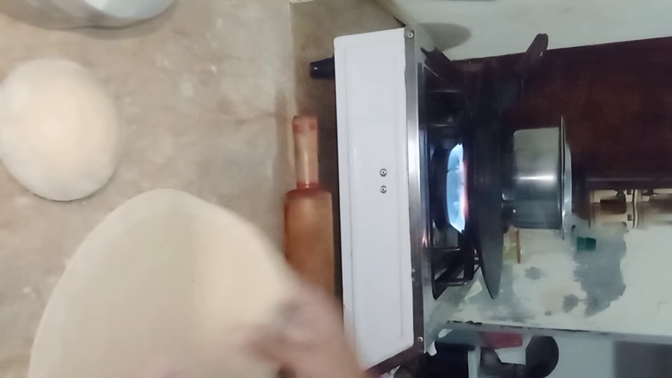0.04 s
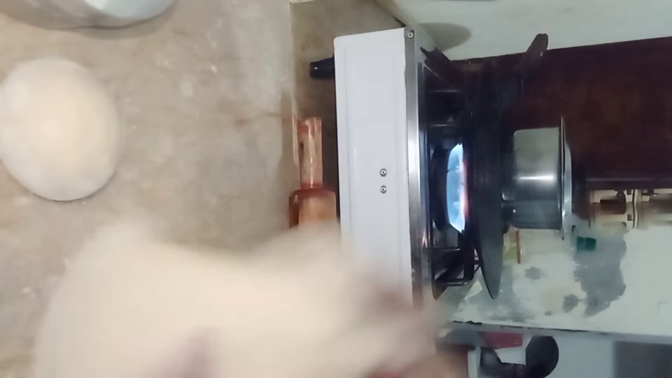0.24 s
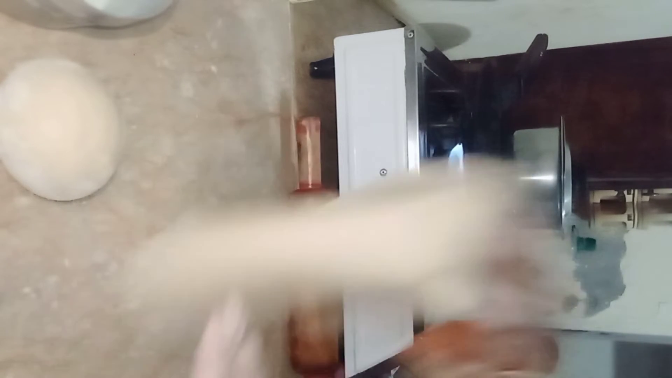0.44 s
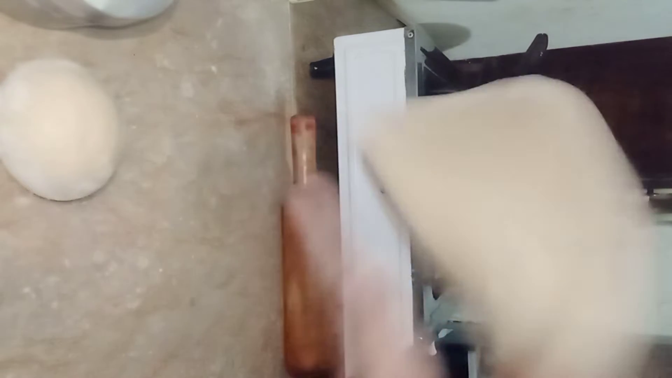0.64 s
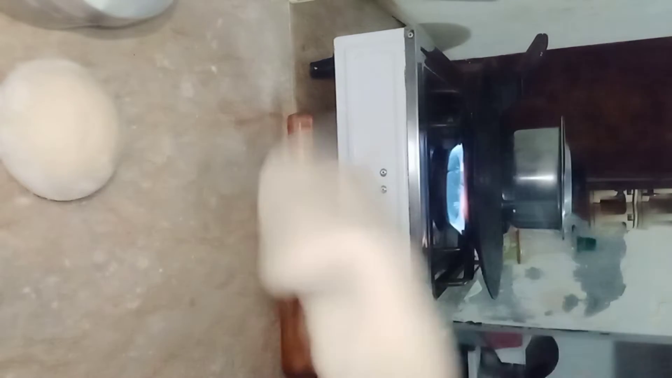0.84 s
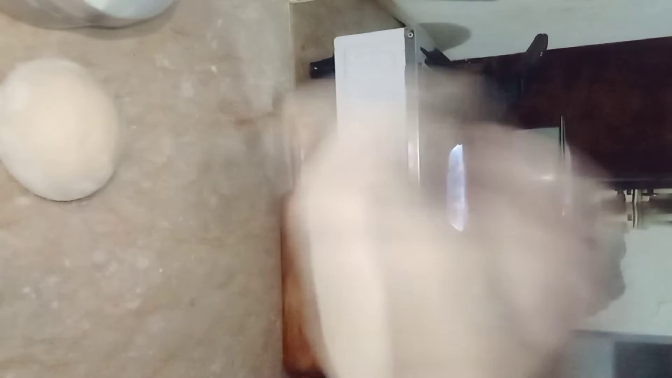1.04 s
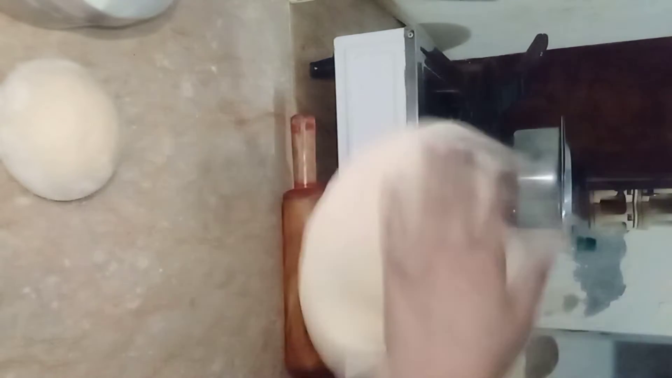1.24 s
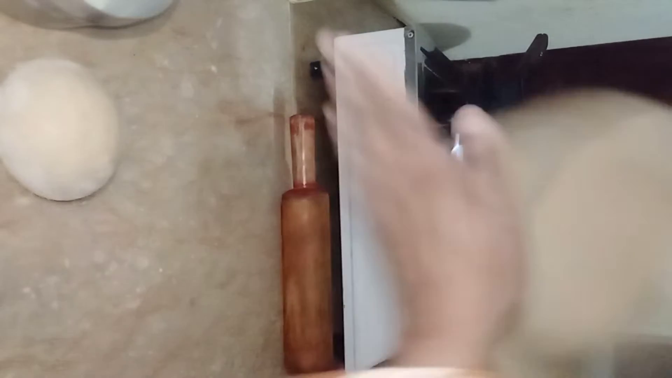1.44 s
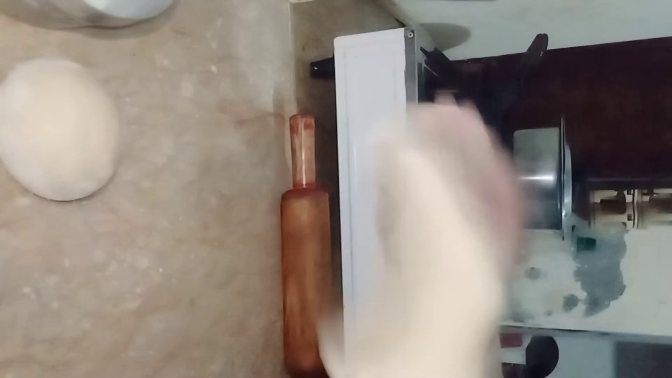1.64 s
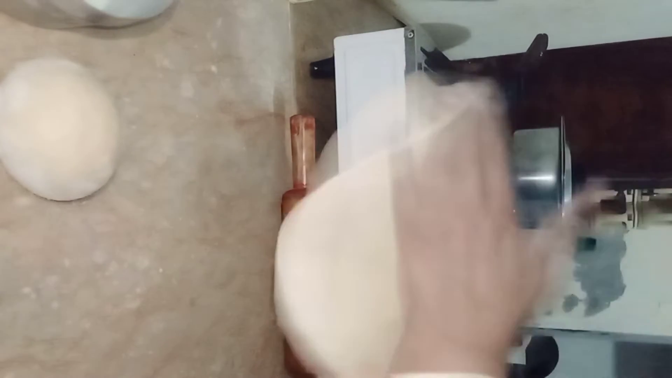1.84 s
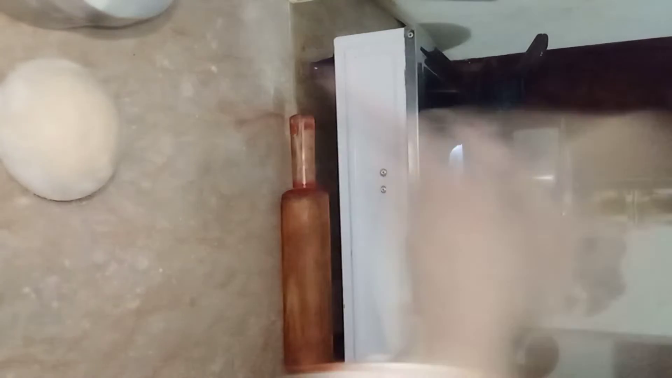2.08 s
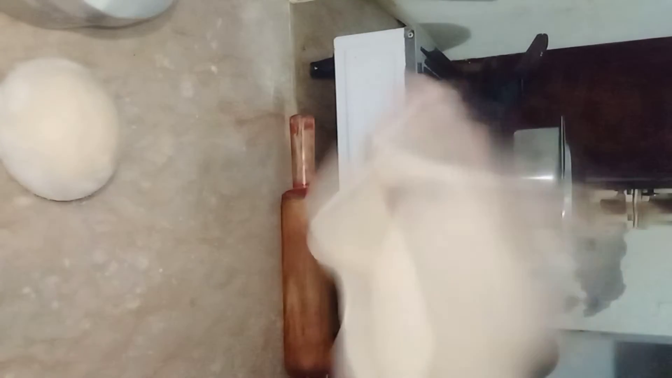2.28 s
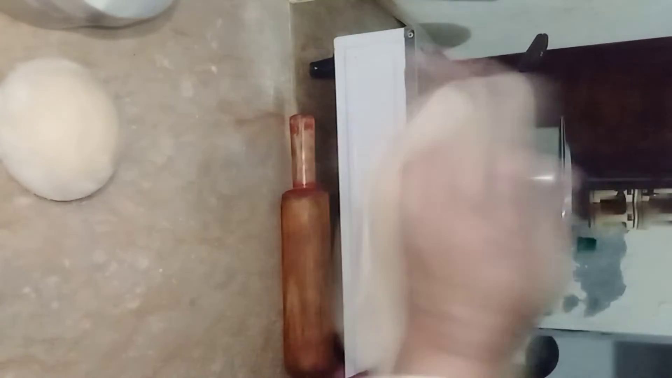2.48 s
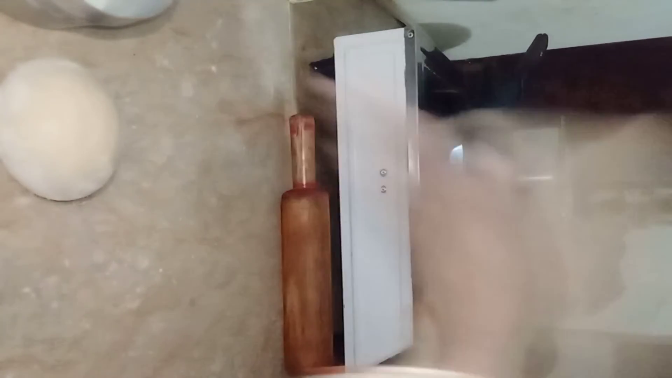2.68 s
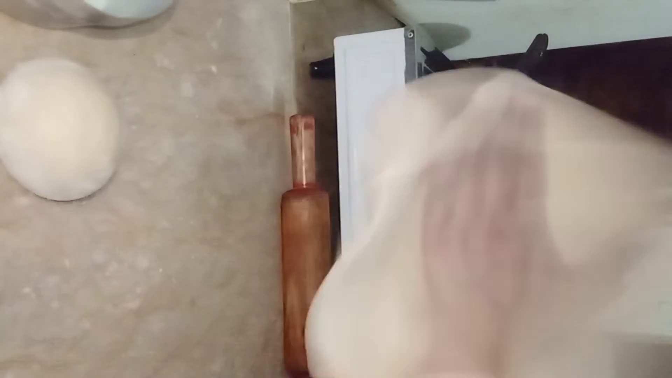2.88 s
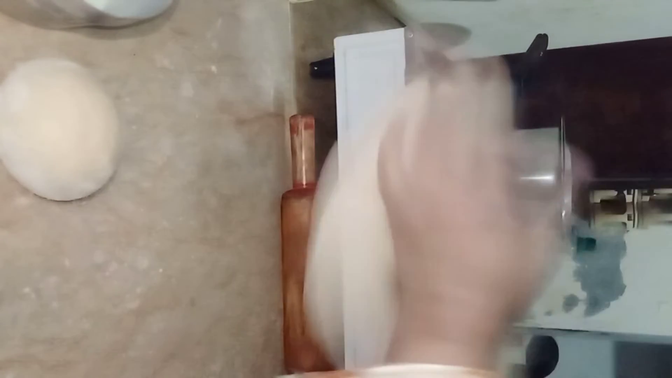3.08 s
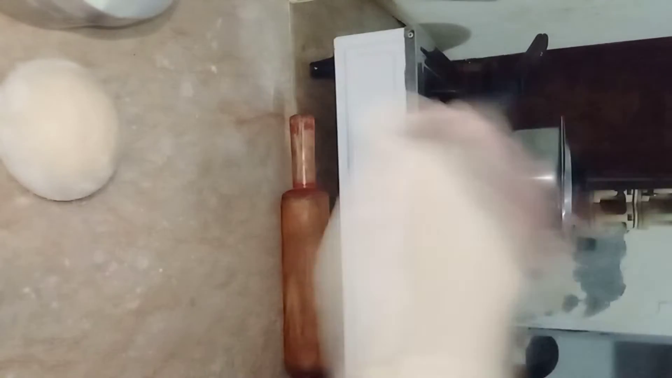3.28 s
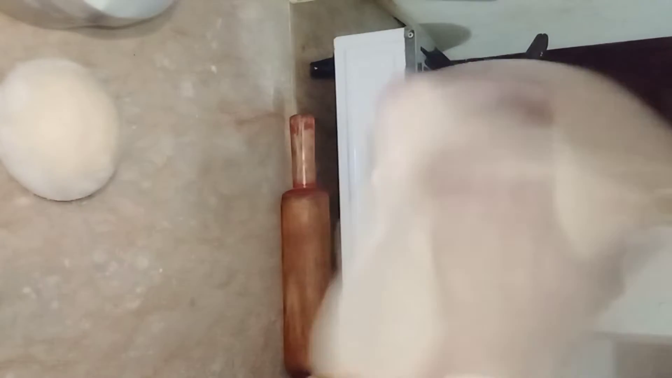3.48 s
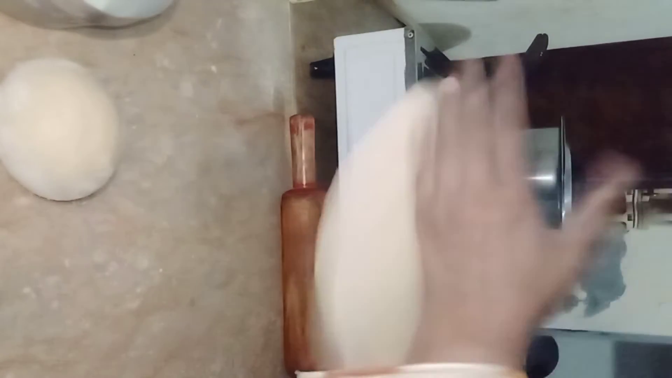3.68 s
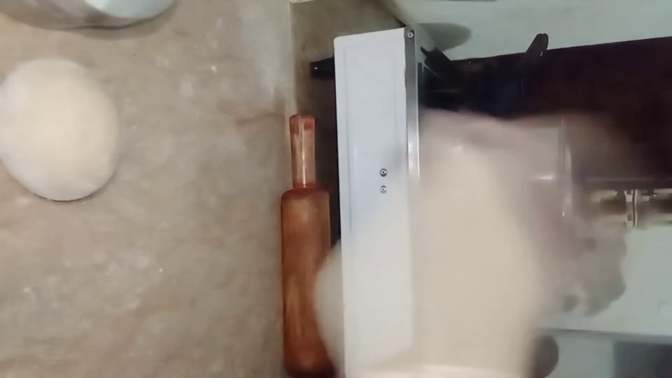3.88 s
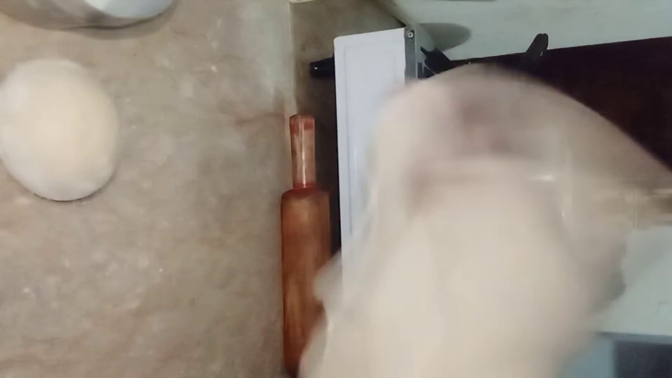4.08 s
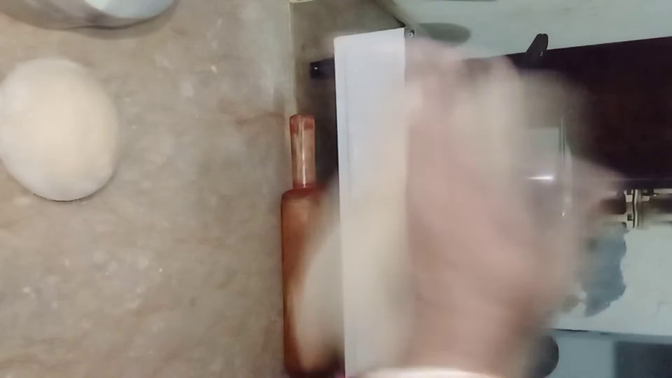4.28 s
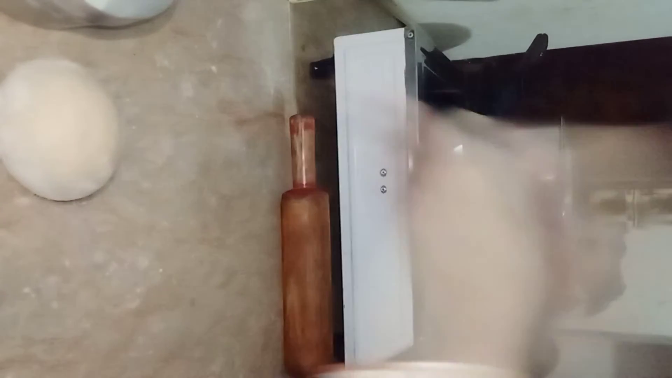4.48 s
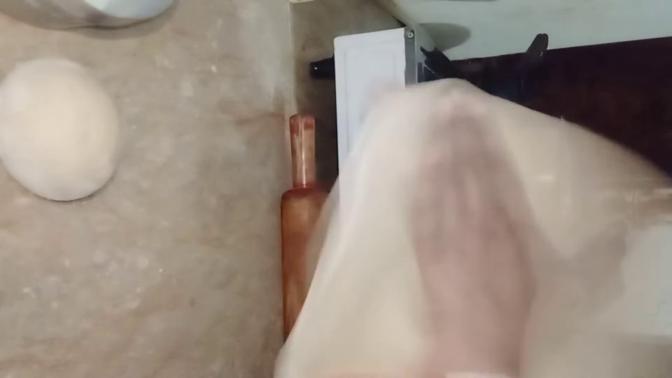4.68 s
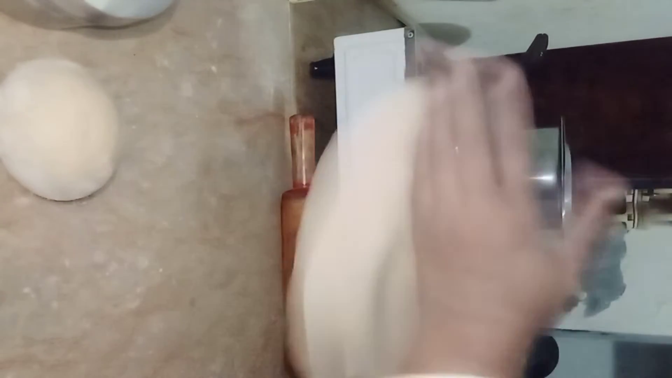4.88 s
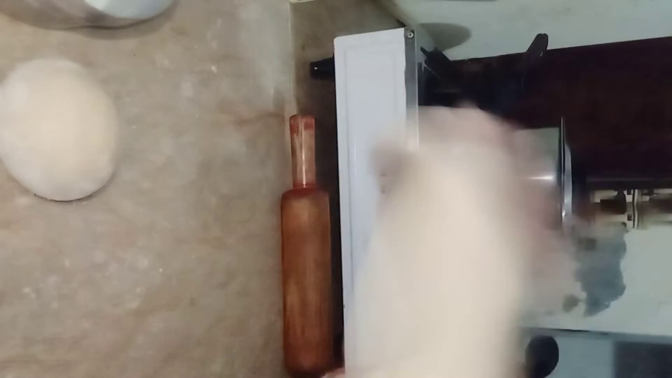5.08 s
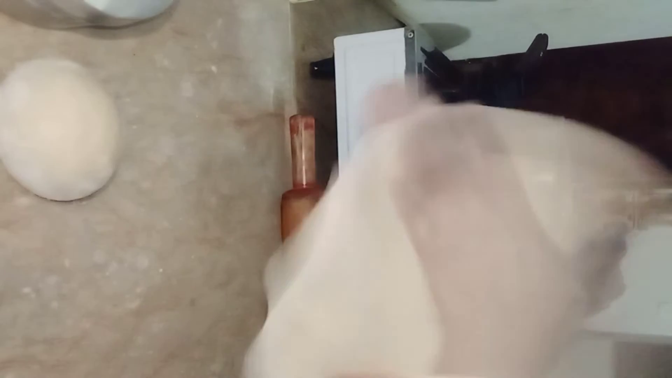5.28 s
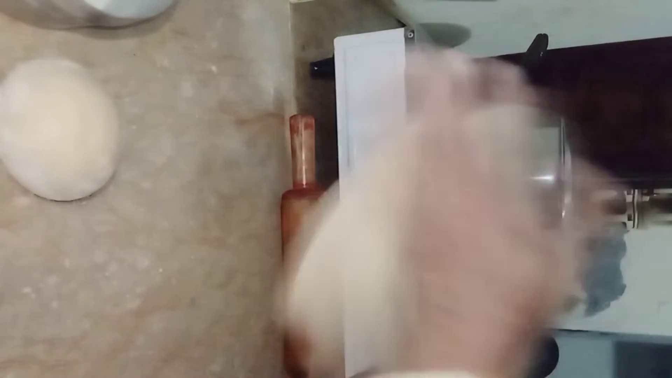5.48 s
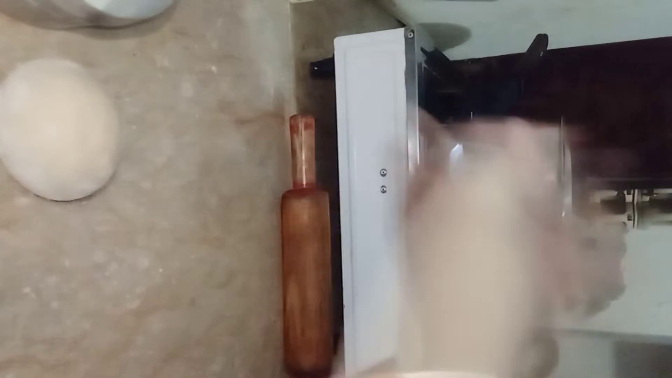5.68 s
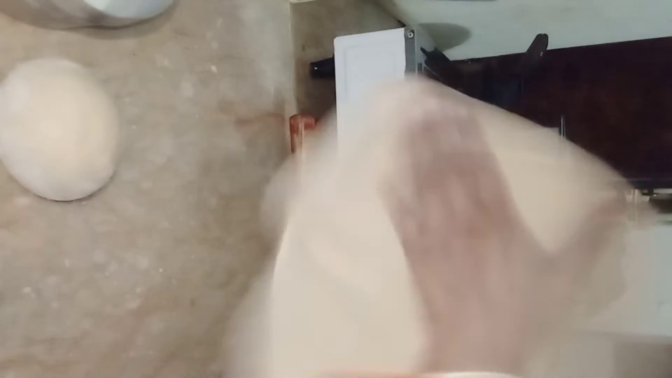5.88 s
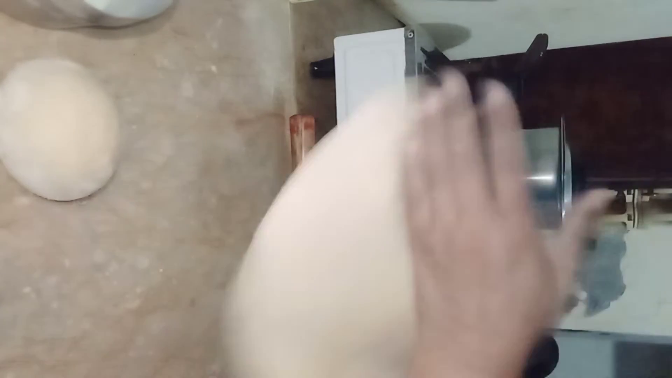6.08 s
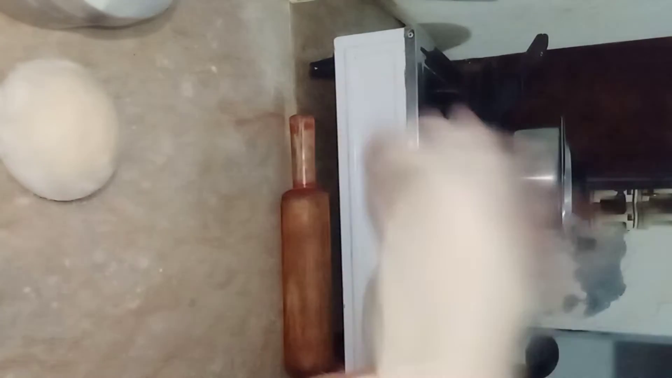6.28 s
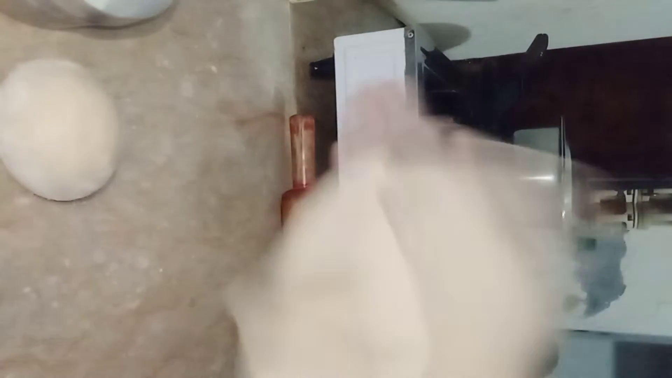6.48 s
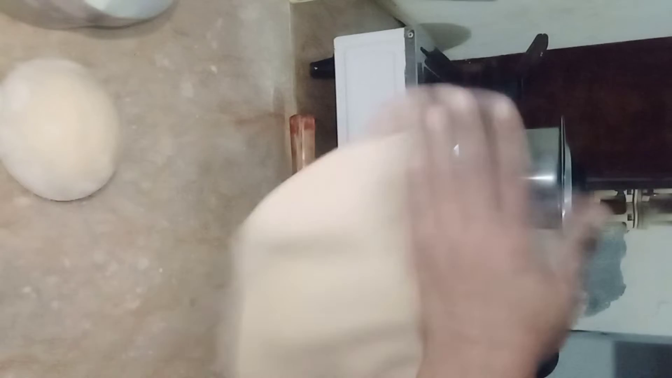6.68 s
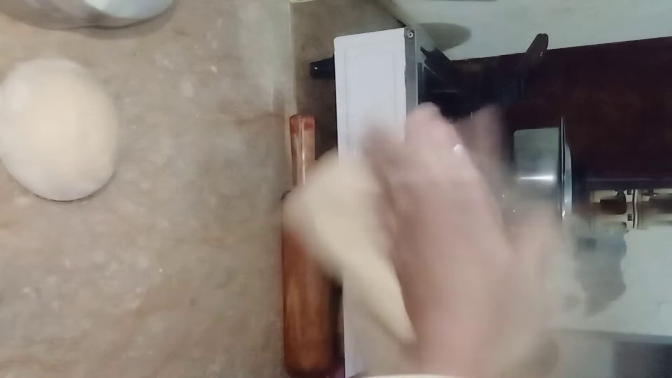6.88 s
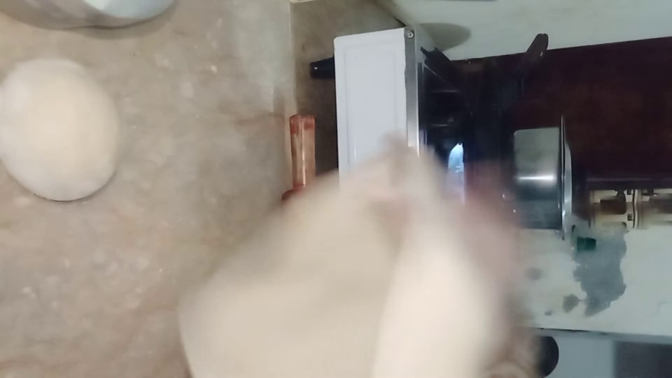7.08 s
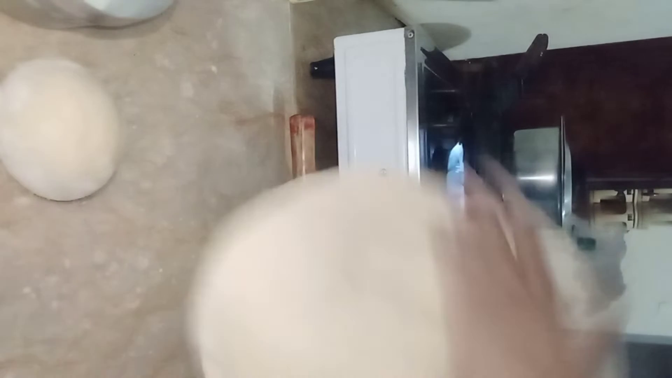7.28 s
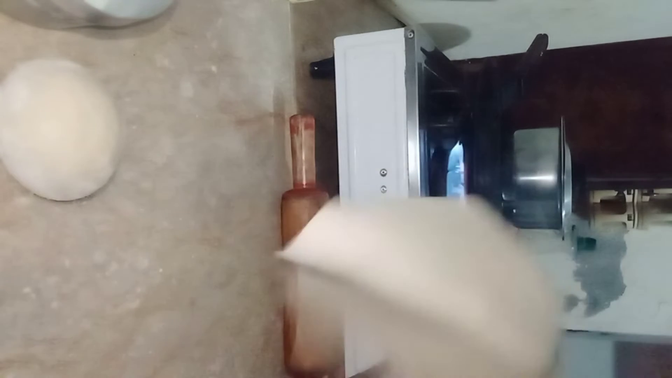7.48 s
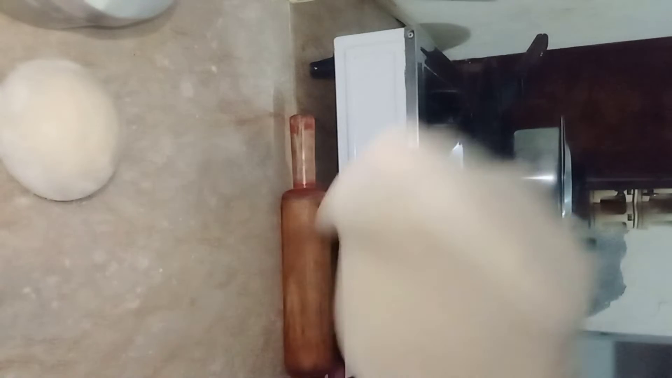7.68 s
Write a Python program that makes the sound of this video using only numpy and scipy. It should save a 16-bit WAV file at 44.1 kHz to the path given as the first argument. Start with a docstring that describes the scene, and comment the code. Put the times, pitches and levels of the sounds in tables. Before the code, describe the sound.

Dough slapped from palm to palm in a kitchen, a quick, even run of claps with faint bangle ticks and a low gas hiss.

```python
"""A gas flame hisses in a hard-walled kitchen, and bangles tick faintly. Flat dough brushes over skin,
then from about 1 s it is tossed from palm to palm, stirring a low rumble of air. Each landing is a few
quick contacts of fingers and palm that squeeze out a pocket of air. Near 4 s the bangles tick again.
After 5.5 s the slaps soften, the dough slides more, and the bangles rub and ring twice. A small
microphone that favours sound near 2 kHz hears it all through a noise suppressor."""
import sys
import numpy as np
from scipy import signal
from scipy.fft import rfft, irfft
from scipy.io import wavfile
from scipy.ndimage import uniform_filter1d, map_coordinates

SR = 44100
rng = np.random.default_rng(int(sys.argv[2]) if len(sys.argv) > 2 else 0)


def transcribe(u):
    """Save the signal u as a 16-bit wav file named by the first command-line argument.

    u: samples, shape (n,) or (channels, n), limited to [-1, 1]; the rate is SR.
    q: integer samples, one column per channel.
    """
    v = np.clip(np.atleast_2d(u).T, -1, 1)
    q = np.round(v * 32767).astype(np.int16)
    wavfile.write(sys.argv[1], SR, q)


N = 341334

# The flame and the kitchen's murmur of air. Each row: frequency in Hz, boost in dB.
FLAME_COLOUR = [(30, -12), (100, 15), (250, 6.5), (500, 1), (870, 5.5), (1100, 3.5), (1700, -1.5),
                (1900, 6), (2400, 4), (2650, -4.5), (2950, -1), (3150, 6), (3400, -9), (5000, -6)]
# Air stirred by the swinging dough. Each row: time in seconds, level in dB.
DRAUGHT_LEVELS = [(0, -89.5), (.56, -90), (.88, -84), (1.3, -81.5), (1.8, -76), (2.2, -71.5), (2.8, -79),
                  (3.05, -68.5), (3.21, -81), (3.49, -76.5), (3.77, -82.5), (4.3, -81), (4.76, -74.5),
                  (4.94, -83), (5.6, -84.5), (6.0, -77), (6.53, -84), (7.0, -78), (7.2, -79), (7.74, -77.5)]
# Bangles knocking together. Each row: start in seconds, level in dB, pitch in Hz.
BANGLE_TICKS = [(.075, -67.5, 3020), (.078, -66.5, 3730), (3.9015, -49.5, 10100), (3.911, -48, 8500),
                (3.921, -54, 6120), (3.921, -63, 4500)]
# The tones of a rubbed bangle. Each row: pitch in Hz, relative level in dB, flutters per second.
BANGLE_TONES = [(1950, -14, 12), (3450, -0.5, 38), (4440, -9, 40), (6320, -16, 35)]
# Bangles rubbing. Each row: start and end in seconds, level it grows to in dB, pitch multiplier.
BANGLE_RUBS = [(5.637, 5.776, -68, 1.005), (6.813, 6.985, -80.5, 1.03)]
# Dough sliding over skin. Each row: time of the peak in seconds, rustle gain in dB, drag gain in dB,
# seconds to swell by 20 dB, seconds to fade by 20 dB.
DOUGH_STROKES = [(0.635, -77, -69, .09, 0.35), (0.831, -78.5, -59, .09, .08), (.906, -80, -46, .02, .09),
                 (1.348, -78.5, -54.5, .025, 0.22), (1.426, -81.5, -63, .06, .06),
                 (5.59, -82, -56, .05, 0.15), (5.716, -78, -58, .1, 0.079), (6.112, -80, -41.5, .02, .06),
                 (6.175, -81.5, -48.5, .02, 0.14), (6.385, -73, -46, .02, 0.043),
                 (6.475, -71, -51.5, .12, .11), (6.727, -89.5, -51.5, .05, 0.18),
                 (6.78, -88.5, -60, .02, 0.2), (6.9, -92.5, -70.5, .2, .4), (7.013, -69, -41, .02, 0.025),
                 (7.098, -80, -55.5, .3, 0.13), (7.422, -92.5, -66, .04, 0.083),
                 (7.495, -79.5, -54.5, .04, 0.29)]
# Standing waves, the notes that ring between walls, counter and cupboards.
# Each row: pitch in Hz, level in dB, seconds to fade by 60 dB.
ROOM_NOTES = [(98, -60, .45), (167.9, -54, 0.38), (281, -55.5, 0.45), (350, -57, 0.51), (487, -56, 0.59),
              (847, -61, .45), (1266, -54, 0.57), (1307, -57.5, .5), (1405, -54.5, 0.65), (1540, -58, 0.45),
              (1935, -60, .5), (3470, -65.5, .5)]
# How long the kitchen echoes. Each row: frequency in Hz, seconds to fade by 60 dB.
ECHO_TIMES = [(60, 0.27), (160, .54), (420, 0.39), (1400, 0.56), (2300, 0.39), (3500, 0.55), (7700, 0.49),
              (11500, 0.52), (13500, 0.28), (15000, 0.2)]
# The tone of each landing on a hand. Each row: start in seconds, thump in dB, air pocket in dB,
# air pocket pitch in Hz, snap pitch in Hz, crack in dB, echo in dB, rise time in milliseconds.
DOUGH_LANDINGS = [(.897, -16.5, -37.5, 910, 2200, -45.5, -9.5, 1.3),
                  (1.340, -15.5, -12, 1480, 2090, -32.5, 3.5, 1.5),
                  (1.694, -25, -12, 1203, 2166, -28, -3, 0.57),
                  (1.966, -14.5, -5, 814, 2330, -31.5, -3.5, 1.15),
                  (2.271, -30, -13, 1486, 2626, -29.5, 3.5, 0.34),
                  (2.531, -15, -14, 1650, 1900, -27.5, 2, 1.05),
                  (2.840, -38, -21.5, 1370, 2464, -33.5, -0.5, .2),
                  (3.120, -10.5, -7, 1287, 1760, -24.5, -2.5, 1),
                  (3.418, -23.5, -18.5, 1550, 2524, -34, 1.5, .4),
                  (3.451, -36.5, -9.5, 1389, 2060, -35, -1, .6),
                  (3.708, -16.5, -4.5, 952, 2190, -28.5, -6, 1.55),
                  (4.006, -22.5, -18, 960, 2110, -31, 4, .4),
                  (4.034, -60.5, -16.5, 1484, 2075, -55.5, 1.5, .4),
                  (4.294, -21, -16, 1533, 2220, -29.5, 1, 1.55),
                  (4.596, -18.5, -11.5, 1200, 2443, -28.5, -0.5, 0.35),
                  (4.863, -22.5, -12, 620, 2266, -33.5, -1.5, 1.5),
                  (5.182, -26, -13, 1560, 2220, -31, 2, 0.73),
                  (5.481, -18, -6.5, 830, 2126, -31, -2.5, 1.4),
                  (5.786, -25, -14, 1447, 2270, -30, -0.5, 1.33),
                  (6.101, -35.5, -25, 1508, 1873, -35, -7, 2.1),
                  (6.174, -15, -3.5, 400, 2180, -27.5, 0, .9),
                  (6.373, -16.5, -35, 1010, 2084, -37, -6, 0.91),
                  (6.724, -25, -19, 1410, 1963, -32.5, 1.5, 2.06),
                  (6.779, -22.5, -2.5, 520, 1983, -32.5, 0.5, 1),
                  (6.996, -9, -20.5, 1545, 2130, -31, -1, 1.06)]
# The dough's loose edge flapping in late. One row like a landing's, without the start.
EDGE_FLAP = (-15, -15, 1202.5, 2045.5, -28, -5, 0.82)
# Fingers and palm meeting the dough. Each row: time in seconds, gain in dB.
HAND_CONTACTS = [(0.8977, -22.5), (0.924, -40), (1.107, -54.5), (1.3398, -48), (1.347, -43.5),
                 (1.3584, -54), (1.4252, -48), (1.6944, -20.5), (1.702, -13.5), (1.7663, -22.5),
                 (1.9672, -25), (1.971, -17), (2.0075, -36), (2.2717, -16), (2.2793, -14), (2.5323, -23.5),
                 (2.5445, -21), (2.841, -4.5), (2.8466, -13.5), (2.8485, -11), (2.8715, -17),
                 (3.1211, -23.5), (3.1335, -29), (3.1534, -43), (3.2129, -27), (3.2584, -42.5),
                 (3.4186, -14), (3.4269, -20.5), (3.4516, -12), (3.4603, -22.5), (3.708, -28.5),
                 (3.715, -16.5), (3.7276, -28), (3.823, -42), (4.0053, -19.5), (4.0154, -16.5), (4.036, -7),
                 (4.2961, -23.5), (4.3026, -20), (4.307, -21.5), (4.342, -27.5), (4.4075, -37),
                 (4.5968, -13.5), (4.6027, -14.5), (4.634, -29), (4.8628, -41), (4.8749, -23), (4.885, -21),
                 (4.9842, -34.5), (5.1827, -17), (5.245, -31.5), (5.4823, -34), (5.4867, -23.5),
                 (5.5008, -24.5), (5.7856, -22), (5.7933, -21.5), (6.1, -25.5), (6.1089, -24.5),
                 (6.176, -35), (6.3731, -27.5), (6.3792, -23), (6.4619, -40), (6.471, -41.5), (6.7231, -40),
                 (6.779, -39.5), (6.996, -37), (7.0064, -30.5), (7.0968, -38)]
# Colours say how strong the lows and highs are. Each row: frequency in Hz, boost in dB.
MIC_COLOUR = [(25, -33.5), (60, -19.5), (170, -12), (600, -12.5), (1300, -9), (1800, -3.5), (2150, -1),
              (2500, -7), (3000, -14.5), (3600, -20), (4200, -30), (7200, -36.5), (7800, -42), (12500, -50),
              (13700, -56), (15000, -49)]
CIRCUIT_COLOUR = [(3500, 5.5), (4800, -2), (7000, 0), (13500, -2.5), (15000, 2.5)]
RUMBLE_COLOUR = [(25, -9), (50, -3.5), (100, 1), (150, -18.5), (400, -60)]
RUSTLE_COLOUR = [(1500, -17), (3000, 10), (5000, 11), (12000, 23)]
DRAG_COLOUR = [(100, -7), (600, -9), (2000, -19.5), (3500, -20), (5000, -19.5)]


def amp(db):
    """Turn decibels into a multiplier."""
    return 10 ** (np.asarray(db) / 20)


def unit(x):
    """Scale a signal to an average (rms) size of 1."""
    return x / np.sqrt(np.mean(x ** 2) + 1e-20)


def value_at(points, hz):
    """Read between (Hz, value) rows on a logarithmic frequency scale."""
    freqs, values = np.transpose(points)
    return np.interp(np.log(hz + 1), np.log(freqs + 1), values)


def wobble(rate):
    """A smooth curve through `rate` random points a second."""
    points = rng.standard_normal(int(N * rate / SR) + 4)
    return map_coordinates(points, [np.arange(N) * rate / SR])


def pulse(colour, size=4096):
    """A click of this colour, with its energy as early as possible (minimum phase)."""
    gains = amp(value_at(colour, np.fft.rfftfreq(size, 1 / SR)))
    cepstrum = irfft(np.log(gains), size)
    cepstrum[1:size // 2] *= 2
    cepstrum[size // 2 + 1:] = 0
    return irfft(np.exp(rfft(cepstrum)), size)[:size // 2]


def noise(colour):
    """Steady noise of this colour."""
    return signal.fftconvolve(rng.standard_normal(N), pulse(colour))[:N]


def flame(gain_db=-74.5):
    """The gas burner's hiss flutters a little."""
    flutter_db = .54 * wobble(2) + .41 * wobble(6.7)
    return amp(gain_db + flutter_db) * noise(FLAME_COLOUR)


def draught():
    """Stirred air hits the microphone's opening and makes a lumpy low rumble."""
    times, levels = np.transpose(DRAUGHT_LEVELS)
    level_db = np.interp(np.arange(N) / SR, times, levels, left=-200, right=-200)
    lumps_db = 2 * wobble(6)
    return amp(level_db + lumps_db) * unit(noise(RUMBLE_COLOUR))


def bangles(tick_s=.018, edge_s=.03, growth_db=6):
    """Bangles give short high ticks as they knock, and a growing ring as they rub together."""
    out, t = np.zeros(N), np.arange(SR // 20) / SR
    for start, db, hz in BANGLE_TICKS:
        fuzz = 1 + .5 * rng.standard_normal(len(t))
        tick = amp(db - 60 * t / tick_s) * fuzz * np.sin(2 * np.pi * hz * t)
        out[round(start * SR):][:len(t)] += tick
    clock = np.arange(N) / SR
    for start, end, end_db, pitch in BANGLE_RUBS:
        edges = np.clip(np.minimum(clock - start, end - clock) / edge_s + .5, 0, 1)
        remaining = np.clip((end - clock) / (end - start), 0, 1)
        swell = edges * amp(end_db - growth_db * remaining)
        for hz, db, rate in BANGLE_TONES:
            flutter = .4 + wobble(3 * rate)
            tone = np.sin(2 * np.pi * hz * pitch * clock + 1.8 * wobble(rate))
            out += swell * amp(db) * flutter * tone
    return out


def dough_slides():
    """Floury dough brushes the skin: a fine rustle over a duller drag."""
    rustle, drag = np.zeros(N), np.zeros(N)
    t = np.arange(-SR // 2, SR) / SR
    for peak, rustle_db, drag_db, swell, fade in DOUGH_STROKES:
        first = round((peak - .5) * SR)
        from_peak = np.where(t < 0, -t / swell, t / fade)
        stroke = amp(-20 * from_peak ** 1.32)[:N - first]
        rustle[first:][:len(t)] += amp(rustle_db) * stroke
        drag[first:][:len(t)] += amp(drag_db) * stroke
    grain = unit(amp(1.5 * wobble(60) + .6 * wobble(12)))
    return grain * (rustle * noise(RUSTLE_COLOUR) + drag * noise(DRAG_COLOUR))


def standing_waves():
    """Sound bouncing between hard surfaces rings as fading notes, one row each."""
    t = np.arange(int(SR * .6)) / SR
    return np.array([amp(db - 60 * t / fade) * np.sin(2 * np.pi * hz * t)
                     for hz, db, fade in ROOM_NOTES])


def kitchen_echo(waves):
    """A fresh echo from the walls: it builds quickly, then each frequency dies at its own speed."""
    t = np.arange(waves.shape[1]) / SR
    hz, times, bands = signal.stft(rng.standard_normal(len(t)), SR, nperseg=256)
    fades = amp(-60 * times / value_at(ECHO_TIMES, hz)[:, None])
    tail = signal.istft(bands * fades, SR, nperseg=256)[1][:len(t)]
    # early echoes arrive in clumps
    clumps = map_coordinates(rng.standard_normal(200), [t * 250])
    tail *= amp(4.86 * clumps * np.exp(-t / .045))
    # a random strength for each note stands for where the hands are
    ringing = rng.standard_normal(len(waves)) @ waves
    build_up = 1 - np.exp(-(t / .00065) ** 2)
    return (tail / np.linalg.norm(tail) + ringing) * build_up


def push_colour(thump_db, pocket_db, pocket_hz, snap_hz, crack_db):
    """The tone of a push: a low thump, the note of the trapped air, a snap and a high crack."""
    thump = [(50, thump_db + 17.5), (200, thump_db + 24.5)]
    pocket = [(pocket_hz * .5, (thump_db + pocket_db) / 2 + 15), (pocket_hz * .89, pocket_db + 13.5),
              (pocket_hz, pocket_db + 20), (pocket_hz * 1.103, pocket_db / 2 + 6.5)]
    snap = [(snap_hz * .85, -3), (snap_hz, 5), (snap_hz * 1.23, -2)]
    crack = [(3400, .35 * crack_db + 9), (6000, crack_db + 21)]
    return sorted(thump + pocket + snap + crack)


def dough_slaps(lead_s=.006, flap_after_s=.045, flatten_ms=3.4):
    """Each contact is a push, coloured by trapped air, and a brighter patter as the skin lies flat."""
    out = np.zeros(N + SR)
    t = np.arange(SR // 25) / SR - lead_s  # skin first touches just before the push at t = 0
    waves = standing_waves()
    for time, db in HAND_CONTACTS:
        landed, *tone = [row for row in DOUGH_LANDINGS if row[0] < time + lead_s][-1]
        if time - landed > flap_after_s:
            tone = EDGE_FLAP
        *body, crack_db, echo_db, rise_ms = tone
        shape = np.exp(-1000 * np.where(t < 0, -t / max(rise_ms, .1), t / flatten_ms))
        patter = rng.standard_normal(len(t)) * shape
        patter /= np.linalg.norm(patter)
        # a slow, soft landing spreads more of the push over the patter
        push = amp(-10.5 + 6 * rise_ms) * patter
        push[round(lead_s * SR)] = 1
        slap = signal.fftconvolve(push, pulse(push_colour(*body, crack_db)))
        slap += signal.fftconvolve(patter, pulse([(2000, crack_db + 25), (4500, crack_db + 31)]))
        echo = amp(echo_db) * signal.fftconvolve(slap, kitchen_echo(waves))
        for part in (slap, echo):
            out[round((time - lead_s) * SR):][:len(part)] += amp(db) * part
    return out[:N]


def scene():
    """Everything that reaches the microphone."""
    return (dough_slaps() + dough_slides() + bangles() + flame() + draught())[None]


def noise_suppressor(x, depth_db=-12, shared=.4, hold=.86):
    """Turn each frequency band down while it is near its own quiet level."""
    bands = signal.stft(x, nperseg=512)[2]
    power = uniform_filter1d(abs(bands) ** 2, size=9, axis=0)
    power = uniform_filter1d(power, size=3, axis=1)
    quiet = 3.5 * np.percentile(power, 15, axis=1, keepdims=True)
    band_open = np.clip(1 - quiet / (power + 1e-20), 0, 1)
    # when the whole sound stands out, every band opens part of the way
    all_open = np.clip(1 - quiet.sum() / (power.sum(0) + 1e-20), 0, 1)
    gain = amp(depth_db) + (1 - amp(depth_db)) * np.maximum(band_open, shared * all_open)
    # open quickly, close slowly
    gain = np.maximum(gain, signal.lfilter([1 - hold], [1, -hold], gain, axis=1))
    gain = uniform_filter1d(gain, size=3, axis=1)
    return signal.istft(bands * gain, nperseg=512)[1][:N]


def record(dry):
    """The microphone colours the sound and adds hiss; noise is turned down and the top treble cut."""
    heard = amp(27.5) * signal.fftconvolve(dry[0], pulse(MIC_COLOUR))[:N]
    hiss = amp(-75.5) * noise(CIRCUIT_COLOUR)
    cleaned = noise_suppressor(heard + hiss)
    passband = np.fft.rfftfreq(N, 1 / SR) < 15600  # Hz
    return irfft(rfft(cleaned) * passband, N)[None]


dry = scene()
out = record(dry)
transcribe(out)
```